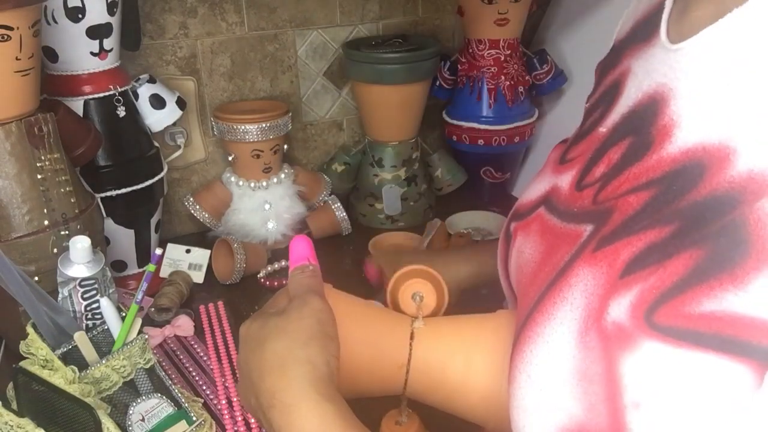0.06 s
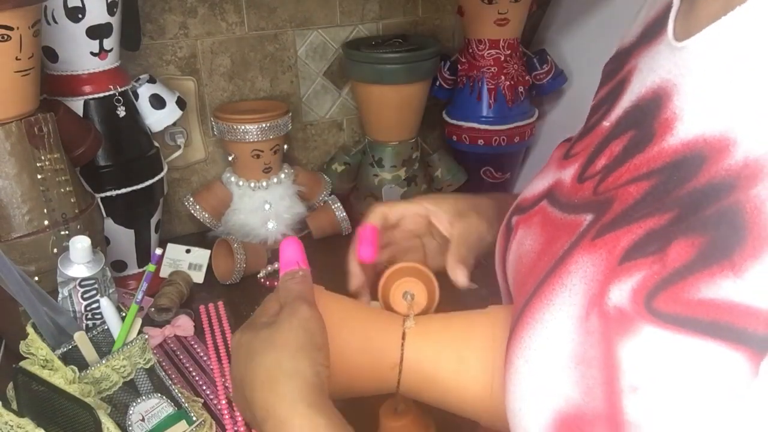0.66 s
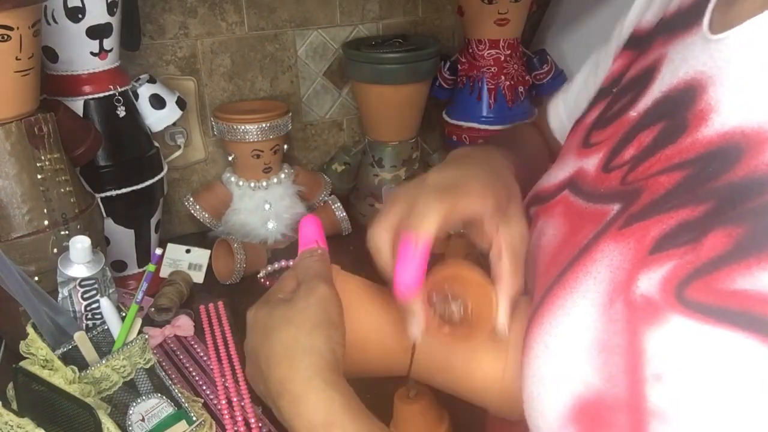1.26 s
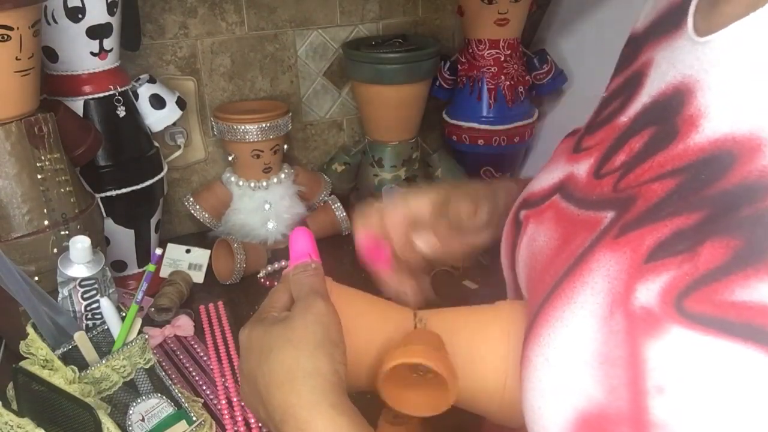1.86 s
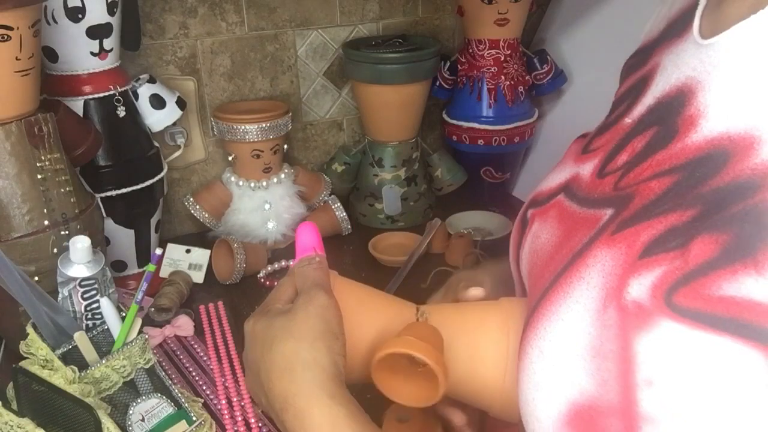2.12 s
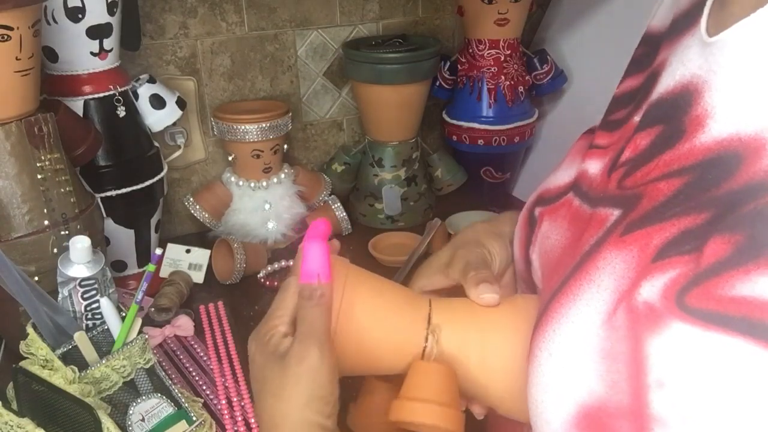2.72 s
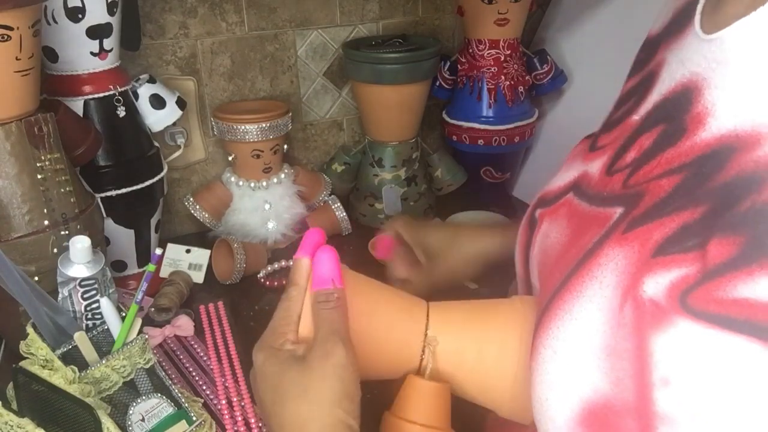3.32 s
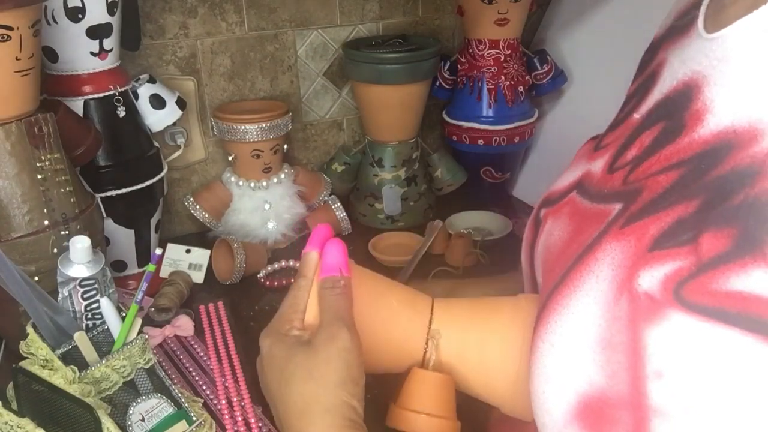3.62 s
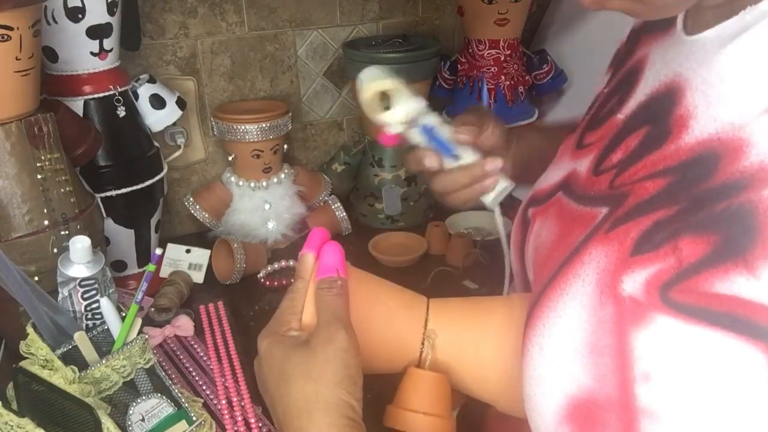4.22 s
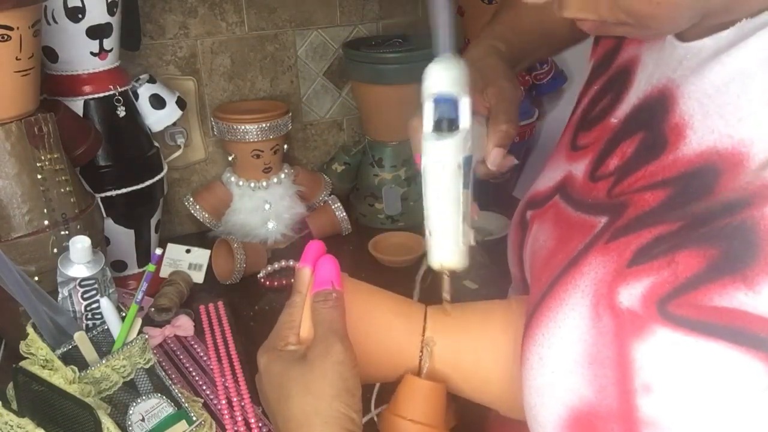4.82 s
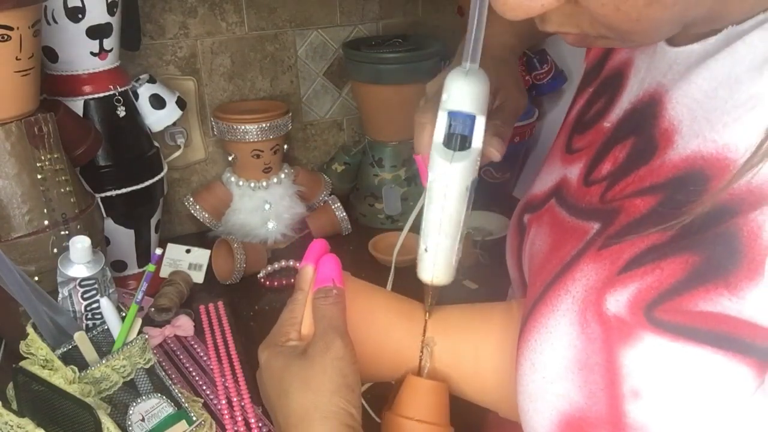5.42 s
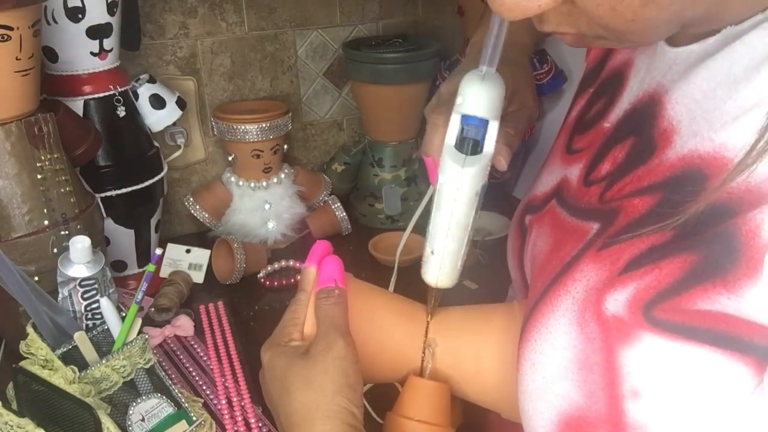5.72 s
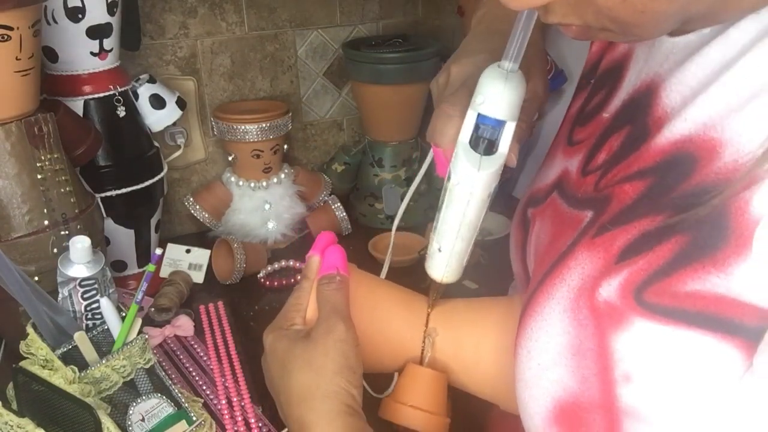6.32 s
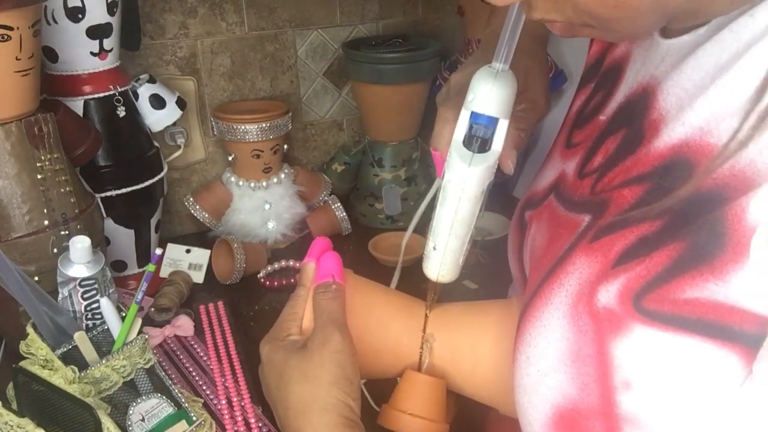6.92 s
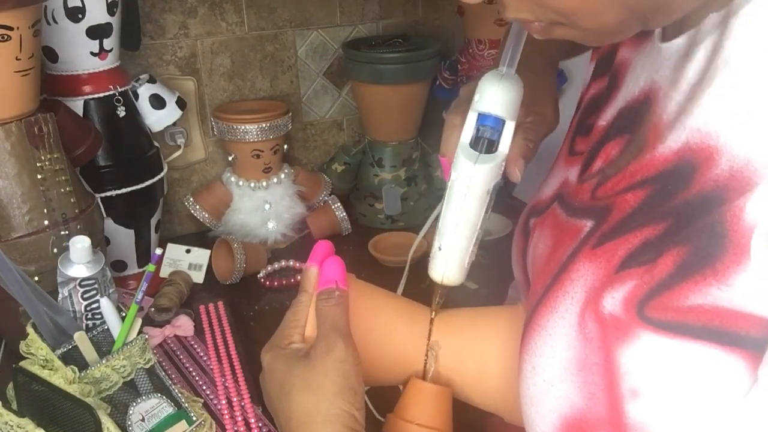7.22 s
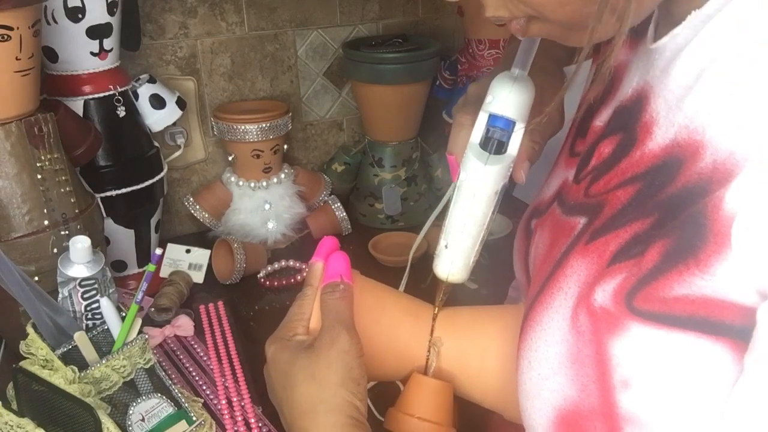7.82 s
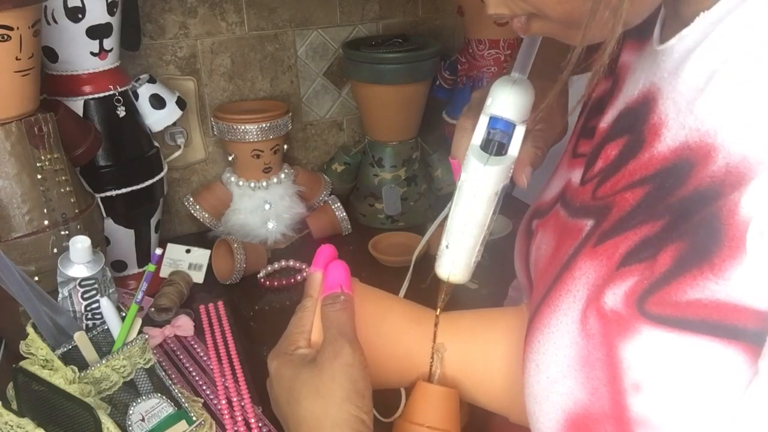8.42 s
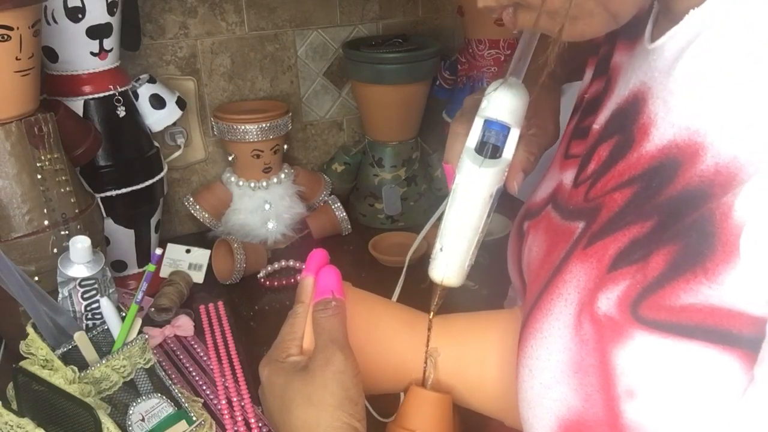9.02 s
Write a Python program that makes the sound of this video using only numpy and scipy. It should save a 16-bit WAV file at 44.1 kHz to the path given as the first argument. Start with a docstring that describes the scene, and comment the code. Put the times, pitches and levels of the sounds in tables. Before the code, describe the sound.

A quiet room hums steadily, with soft air noise, and small handling sounds are heard close by. Right at the start a clay saucer rings and clacks down on a wooden table, by far the loudest sound. From 0.5 to 2.2 seconds come faint scrapes, thin fingernail chinks on a small pot and light knocks on a hollow clay figure. Between 2.2 and 3.2 seconds skin rubs unglazed clay with a soft, slightly singing hiss. From about 3.5 to 5 seconds a glue gun is lifted, with a chink, a short scrape, light plastic clicks and cord swishes. Its nozzle taps the clay near 5.3 seconds. The trigger then ticks dryly and irregularly from 5.5 to 7.5 seconds, most sharply at 7.1. Around 8.6 seconds the feed jerks and snaps with a brief drag of the glue stick, and a last tick follows at 9.1.

```python
"""A craft table in a quiet, humming room, where small clay pots are handled.
A saucer rings and clay clacks down on the wood. Fingers knock on a hollow pot figure, nails chink
on a small pot, and skin rubbing the unglazed clay makes both hiss and sing. Then a glue gun is lifted:
its cord swishes, its plastic trigger sticks and slips in ticks, and the feed gives way with a snap."""
import sys
import numpy as np
from scipy import signal
from scipy.fft import rfft, irfft, next_fast_len
from scipy.io import wavfile

SR = 44100
rng = np.random.default_rng(int(sys.argv[2]) if len(sys.argv) > 2 else 0)


def persist_wave(psi):
    """Save psi, clipped to +-1, as 16-bit WAV."""
    counts = np.round(np.clip(psi, -1, 1) * 32767).astype(np.int16)
    wavfile.write(sys.argv[1], SR, np.atleast_2d(counts).T)


N = 403956
FFT_SIZE = next_fast_len(N)
HZ = np.fft.rfftfreq(FFT_SIZE, 1 / SR)
TIME = np.arange(N) / SR


def clay_clacks():
    """The struck saucer's brief noise dies away, then clay rocks and clacks down on the table."""
    # the saucer's noise first, then the clacks: t/s, level/dB, contact/s
    clacks = [(0, -37.5, 0.019), (.0525, -34.5, 0.0022), (.059, -37, 0.0024), (.078, -39, 0.011),
              (.086, -38.5, 0.0047), (.1015, -20, 0.0012), (.1037, -20, 0.00062), (.1078, -26, 0.0015)]
    # colour of clay on wood: f/Hz, level/dB
    crack = [(20, -58), (60, -24), (130, -7), (250, -11), (380, -5), (540, -13.5), (760, -0.5), (1050, -6),
             (1400, 8), (1950, -3.5), (2500, -2), (3200, -4), (3900, 1.5), (5500, -5.5), (8300, -1.5),
             (10000, -5.5), (12000, -1), (16000, -6)]
    # the table's ring: f/Hz, level/dB, t60/s
    modes = [(727, -5, .07), (1300, -3, .04), (1555, -2, .04), (2620, -4, .04), (3680, -1, .06),
             (3914, -2, .04), (4310, -4, .05), (4936, -8, .05), (5510, -7, .025), (6390, -7, .05),
             (7005, -7, .05), (7180, -8, .05), (8400, -4, .025)]
    hits = by_force(clacks, pivot_db=-19.5, bright_hz=12100, brighten=.4, knock_db=-13, knock_slope=1)
    return blows(hits, crack, modes, hollow_hz=360, width_hz=110, ring_db=-15, tail_db=-8, low_hz=50.2)


def figure_taps():
    """Fingers, a hanging pot and the gun's nozzle knock on the hollow figure."""
    # t/s, level/dB, brightness/Hz, contact/s, hollow knock/dB
    taps = [(1.3473, -48.5, 1180, .00055, 15), (1.7962, -51.5, 2100, .0014, 11),
            (1.859, -51, 2570, 0.00031, -10), (2.112, -57.5, 1300, .002, 16),
            (2.151, -59, 1697, 0.00041, -10), (3.615, -57.5, 1500, 0.0044, -17),
            (5.3101, -56.5, 1400, .00045, -10), (5.3351, -48.5, 1395, 0.00045, -26),
            (5.3946, -54, 1200, 0.00042, -3), (8.490, -51, 1500, 0.00053, 3),
            (8.599, -48.5, 1800, 0.0028, -18)]
    # colour of the contact: f/Hz, level/dB
    thud = [(20, -44), (100, -3), (500, -7.5), (800, -0.5), (1380, 4.5), (1800, -4), (2400, 3), (3300, -14),
            (16000, -15)]
    # the figure's ring: f/Hz, level/dB, t60/s
    modes = [(740, 3, 0.1), (857, 4, 0.02), (960, 5, 0.036), (1233, -9, .05), (1320, 1, 0.09),
             (1624, -4.5, 0.088), (2230, 22, .05)]
    return blows(taps, thud, modes, hollow_hz=762, width_hz=115, ring_db=-30, tail_db=-9.5)


def glue_gun():
    """A plastic shell clicks under the hand as trigger and feed stick and slip."""
    # the hand shifts its grip: t/s, level/dB, brightness/Hz
    grips = [(3.2323, -65.5, 9120), (3.532, -69, 13000), (3.559, -64.5, 10960), (3.701, -61, 4470),
             (3.7287, -60.5, 10000), (3.7652, -63, 4570), (3.8296, -54.5, 15100), (3.84, -51, 15000),
             (4.681, -59, 5500), (4.701, -51.5, 4790), (5.7386, -65.5, 4800), (7.6436, -67, 12000)]
    # the trigger slips under a slow squeeze: t/s, level/dB
    ticks = [(5.4607, -60), (5.8893, -53), (6.153, -46.5), (6.228, -51), (6.362, -49), (6.4908, -45),
             (7.1156, -41), (7.5101, -51.5), (8.4899, -52.5), (9.114, -46)]
    # the feed jerks, ending in a snap: t/s, level/dB
    jerks = [(8.5, -50), (8.5956, -50), (8.6063, -45), (8.617, -38)]
    # the glue stick drags in its sleeve: t/s, level/dB
    drags = [(8.563, -54), (8.727, -52.5)]
    # colour of the contact: f/Hz, level/dB
    crack = [(20, -44), (100, -33), (500, -15), (900, -4.5), (1500, -2), (2300, -1.5), (3300, -3),
             (4100, 2), (5150, 7.5), (5900, 2), (7500, 1), (9000, 4.5), (12000, 5), (16000, -3)]
    # the shell's ring: f/Hz, level/dB, t60/s
    modes = [(825, 1, 0.039), (1554, -1.5, 0.05), (1900, -6, .05), (2345, -5.5, 0.064), (3850, -10, 0.07),
             (4100, -8, 0.031), (4770, 12, 0.014), (5100, 2, 0.032)]
    # t/s, level/dB, brightness/Hz, contact/s, hollow knock/dB
    hits = [(s, db, hz, .0067, 2) for s, db, hz in grips]
    hits += by_force([(s, db, .00038) for s, db in ticks],
                     pivot_db=-46.5, bright_hz=9400, brighten=.52, knock_db=-23.5, knock_slope=.73)
    hits += [(s, db, 5900, .0033, -3.5) for s, db in jerks]
    hits += [(s, db, 6300, .032, -14) for s, db in drags]
    return blows(hits, crack, modes, hollow_hz=2300, width_hz=2600, ring_db=-12.5, tail_db=-10)


def chinks(nudge_s=.017, spot_db=3):
    """Thin clay rings freely: a saucer nudges its neighbour, and nails catch the small pot."""
    # the saucer's ring: f/Hz, level/dB, t60/s
    saucer = [(1254, -49, .16), (1680, -29, 0.19), (2360, -45, .18), (2643, -50, .18), (3672, -24, 0.15),
              (3817, -38.5, 0.15), (5930, -42, 0.15), (8290, -43, 0.12), (9986, -55, .08)]
    # its neighbour's ring: f/Hz, level/dB, t60/s
    neighbour = [(4242, -33, .1), (6025, -42.5, 0.24), (8543, -50, .15)]
    # the small pot's ring: f/Hz, level/dB, t60/s
    pot = [(3700, -3.5, 0.086), (4100, -10, .12), (5426, -8, 0.071), (7601, -32, .08), (8670, -3, 0.091),
           (10100, -14, .06), (11550, -9, .06)]
    # t/s, level/dB, brightness/Hz
    nails = [(.765, -74, 13840), (.83, -65, 14000), (1.28, -66, 15000), (1.347, -52.5, 7900),
             (1.796, -53.5, 3200), (1.859, -57, 2980), (3.615, -55.5, 5050)]
    t, out = np.arange(12000) / SR, np.zeros(N)
    attack = 1 - np.exp(-t / .00028)
    add(out, 0, ring(saucer, t) * attack)
    add(out, nudge_s, ring(neighbour, t) * attack)
    for s, level_db, bright_hz in nails:
        # each spot that a nail touches favours other modes
        modes = [(hz, db + spot_db * rng.standard_normal() - 20 * np.log10(1 + (hz / bright_hz) ** 3), t60)
                 for hz, db, t60 in pot]
        add(out, s, amp(level_db) * ring(modes, t) * attack)
    return out


def finger_rubs(swell=.63):
    """Fingers stroke the small pot, gathering speed slowly and lifting off faster."""
    # fastest moment/s, length/s, level/dB
    rubs = [(0.845, 0.049, -67), (1.05, 0.31, -73.5), (1.295, .05, -67.5), (1.48, .14, -75),
            (1.635, .05, -73), (2.301, .07, -69.5), (2.457, 0.17, -65), (2.732, 0.21, -66),
            (3.135, 0.1, -61)]
    # the rubbed pot sings: f/Hz, width/Hz, level/dB
    resonances = [(3910, 100, -4), (5500, 280, -10), (6430, 55, -10), (7100, 170, -8), (7700, 79, -14),
                  (8300, 97, -9), (9040, 182, -18), (10240, 53, -3), (11500, 220, -7)]
    pressure = sum(amp(db) * bump(TIME - s, length * np.where(TIME < s, swell, 1 - swell))
                   for s, length, db in rubs)
    return rubbing(pressure, resonances, gain_db=-1, sing_db=4)


def palm_rub(start_s=2.792, attack_s=.028, hold_s=.13, release_s=.053, sag_db_per_s=55):
    """The hand slides along the figure: it bites, slows and lifts off."""
    # the rubbed figure sings: f/Hz, width/Hz, level/dB
    resonances = [(3520, 60, 9), (4840, 33, 4), (6470, 79, 3), (6740, 60, -1), (8140, 45, 2), (9300, 52, 3),
                  (10300, 30, -13), (10500, 35, -10), (11000, 38, -8), (11700, 52, -11), (11900, 40, -8),
                  (14500, 72, -10)]
    corners = start_s + np.cumsum([0, attack_s, hold_s, release_s])
    sag = amp(-sag_db_per_s * np.maximum(TIME - corners[1], 0))
    pressure = np.interp(TIME, corners, [0, 1, 1, 0]) * sag
    return rubbing(pressure, resonances, gain_db=-54, sing_db=-.5)


def clay_slides(skirt=.95, sharpness=.024):
    """Dragged clay sings in a narrow resonance on a broad skirt of scraping."""
    # middle/s, length/s, level/dB, f/Hz, purity/dB
    slides = [(.49, 0.21, -66, 3136, 11), (0.799, 0.063, -56.5, 805, 21.5), (2.187, 0.25, -68.5, 3160, 15),
              (2.435, 0.23, -70, 3930, 10), (2.723, 0.22, -69, 3880, 6), (3.71, 0.039, -53.5, 500, 2),
              (3.738, 0.037, -63, 3110, 12)]
    out = np.zeros(N)
    for s, length, db, hz, purity_db in slides:
        scrape = peaks([(hz, skirt * hz, 0), (hz, sharpness * hz, purity_db)], HZ)
        low_cut = HZ / (HZ + hz / 2)
        out += strokes([(s, length, db)], scrape * low_cut)
    return out


def cord_swishes():
    """Cord and sleeve brush past with a soft hiss."""
    # middle/s, length/s, level/dB
    swishes = [(3.95, 0.22, -73.5), (4.13, 0.15, -74.5), (4.265, 0.071, -59.5), (4.5, 0.15, -64),
               (4.675, 0.052, -65.5), (4.905, 0.068, -66), (5.65, 0.26, -76)]
    # colour of the brushing: f/Hz, level/dB
    colour = [(300, -17), (1500, -5), (5000, 1.5), (9000, -3), (13000, -3), (16000, -18.5)]
    return strokes(swishes, amp(read(colour, HZ)))


def room(x, tail_db, clutter_db=-3, clutter_t60=.075):
    """Single echoes, quick scatter from the cluttered table, then the room's tail."""
    # bounces off the table and pots: delay/s, gain
    echoes = [(.0012, .25), (.0035, 0.37), (.005, .25), (.0073, .42)]
    # the tail's decay: f/Hz, t60/s
    decay = [(150, 0.59), (700, 0.31), (3000, 0.37), (8000, 0.31), (15000, 0.15)]
    t = np.arange(12288) / SR
    hz, frame_s, spectra = signal.stft(rng.standard_normal(len(t)), SR, nperseg=256)
    spectra *= amp(-60 * frame_s / read(decay, hz)[:, None])
    tail = signal.istft(spectra, SR, nperseg=256)[1][:len(t)] * (1 - np.exp(-t / .0086))
    scatter = rng.standard_normal(len(t)) * amp(-60 * t / clutter_t60) * (1 - np.exp(-t / .0015))
    response = amp(clutter_db) * unit(scatter) + amp(tail_db) * unit(tail)
    response[0] += 1
    for delay, gain in echoes:
        add(response, delay, np.array([gain]))
    return signal.fftconvolve(x, response)


def room_tone(air_db=-57.5):
    """Steady air noise and a hum of narrow, wavering resonances."""
    # colour of the air: f/Hz, level/dB
    air = [(15, -55), (25, -26), (53, -8.5), (141, -7), (170, -2), (211, -1.5), (228, -9.5), (299, -7),
           (403, -12.5), (486, -17.5), (1120, -23), (2200, -31.5), (3490, -34), (11700, -38),
           (15800, -43.5)]
    # f/Hz, half-width/Hz, level/dB
    hum = [(174, 7.1, -68), (206, 6.3, -66.5), (306, 12, -66.5), (354.8, 11, -71), (409.7, 22, -69),
           (3520, 200, -82)]
    power = sum(amp(db) ** 2 * unit(peaks([(hz, 2 * half, 0)], HZ)) ** 2 for hz, half, db in hum)
    return amp(air_db) * noise(amp(read(air, HZ))) + np.sqrt(power.sum()) * noise(np.sqrt(power))


def blows(hits, crack, modes, hollow_hz, width_hz, ring_db, tail_db, low_hz=110, size=4096):
    """Each blow is a burst of tiny contacts that cracks and rings the body; soft blows lack treble."""
    t, hz, out = np.arange(size) / SR, np.fft.rfftfreq(size, 1 / SR), np.zeros(N)
    body = amp(ring_db) * unit(ring(modes, t))
    radiation = hz ** 2 / (hz ** 2 + low_hz ** 2)  # small things radiate little bass
    for s, db, bright_hz, contact_s, knock_db in hits:
        onset = 1 - np.exp(-4 * (t + 1 / SR) / contact_s)  # long contacts start gently
        fade = onset * np.exp(-np.minimum(t / contact_s, 20))
        grit = rfft(rng.standard_normal(size) * fade)
        force = irfft(grit / (abs(grit) + 1e-12)) * np.sqrt(fade)  # drives all frequencies alike
        sound = coloured(force, amp(read(crack, hz))) + signal.fftconvolve(force, body)[:size]
        softness = 1 / np.sqrt(1 + (hz / bright_hz) ** 5)
        knock_hz = hollow_hz * (1 + .065 * rng.standard_normal())  # the grip shifts the resonance
        hollow = .5 + peaks([(knock_hz, width_hz, knock_db)], hz)
        sound = coloured(sound, softness * radiation * hollow)
        sound = room(sound, tail_db)  # each spot meets the room by its own paths
        add(out, s, amp(db) * unit(sound) * np.sqrt(.02 * SR))  # level as rms over 20 ms
    return out


def by_force(hits, pivot_db, bright_hz, brighten, knock_db, knock_slope):
    """Harder blows are brighter; gentler ones keep more of the hollow knock."""
    return [(s, db, bright_hz * amp(brighten * (db - pivot_db)), contact_s,
             knock_db - knock_slope * (db - pivot_db)) for s, db, contact_s in hits]


def rubbing(pressure, resonances, gain_db, sing_db):
    """Friction hiss excites a few strong modes of a pot and a thicket of weak ones."""
    # skin on unglazed clay: f/Hz, level/dB
    hiss = [(500, -25), (2500, -13), (4000, -8.5), (5200, -12.5), (7000, -6), (12000, -5), (16000, -14)]
    thicket = amp(3 * wander(HZ, spacing=90))
    colour = amp(read(hiss, HZ)) * thicket + amp(sing_db) * peaks(resonances, HZ)
    return amp(gain_db) * pressure * grain(depth_db=1.75, rate_hz=90) * noise(colour)


def strokes(moves, colour):
    """Friction that swells and fades with the speed of each move."""
    t = np.arange(0, N / SR, .002)
    speed = sum(amp(db) * bump(t - s, length / 2) for s, length, db in moves)
    return np.interp(TIME, t, speed) * grain(depth_db=2, rate_hz=65.9) * noise(colour)


def grain(depth_db, rate_hz):
    """The uneven catching of one surface on another."""
    return evened(amp(depth_db * wander(TIME, .5 / rate_hz)))


def ring(modes, t):
    """A sum of dying sines."""
    return sum(amp(db - 60 * t / t60) * np.sin(2 * np.pi * hz * t) for hz, db, t60 in modes)


def peaks(resonances, hz):
    """Gain of a set of resonances."""
    return sum(amp(db) / (1 + (2 * (hz - centre) / width) ** 2) for centre, width, db in resonances)


def coloured(x, gain):
    """Minimum-phase filter: nothing sounds before the blow."""
    log_gain = np.log(np.maximum(np.r_[gain, gain[-2:0:-1]], 1e-5))
    return irfft(rfft(x) * np.exp(np.conj(signal.hilbert(log_gain)))[:len(gain)])


def noise(colour):
    """Coloured noise of rms 1."""
    return evened(irfft(rfft(rng.standard_normal(FFT_SIZE)) * colour, FFT_SIZE)[:N])


def wander(axis, spacing):
    """A random curve of rms 1 with a new value at every spacing."""
    knots = np.arange(0, axis[-1] + spacing, spacing)
    return evened(np.interp(axis, knots, rng.standard_normal(len(knots))))


def bump(t, width):
    """A bell-shaped swell around t = 0."""
    return np.exp(-np.minimum((t / width) ** 2, 20))


def read(points, hz):
    """Reads a curve on a log-frequency axis."""
    f, value = np.transpose(points)
    return np.interp(np.log(hz + 1), np.log(f + 1), value)


def add(mix, s, sound):
    """Mixes a sound in at time s."""
    part = mix[max(0, round(s * SR)):][:len(sound)]
    part += sound[:len(part)]


def amp(db):
    """Decibels to gain."""
    return 10 ** (np.asarray(db) / 20)


def evened(x):
    """Scales to rms 1."""
    return x / np.sqrt(np.mean(x ** 2) + 1e-20)


def unit(x):
    """Scales to energy 1."""
    return x / np.sqrt(np.sum(x ** 2) + 1e-20)


def scene():
    """Knocks, friction and ringing clay over the room tone, in mono."""
    knocks = clay_clacks() + figure_taps() + glue_gun()
    friction = finger_rubs() + palm_rub() + cord_swishes()
    return (knocks + friction + chinks() + clay_slides() + room_tone())[None]


def record(dry):
    """A steep high cut at 15.9 kHz."""
    return signal.oaconvolve(dry, signal.firwin(511, 15900, window=("kaiser", 9), fs=SR)[None], "same")


dry = scene()
out = record(dry)
persist_wave(out)
```